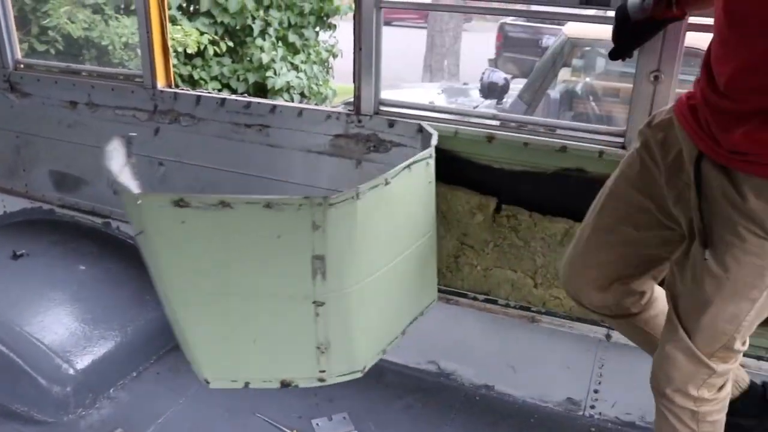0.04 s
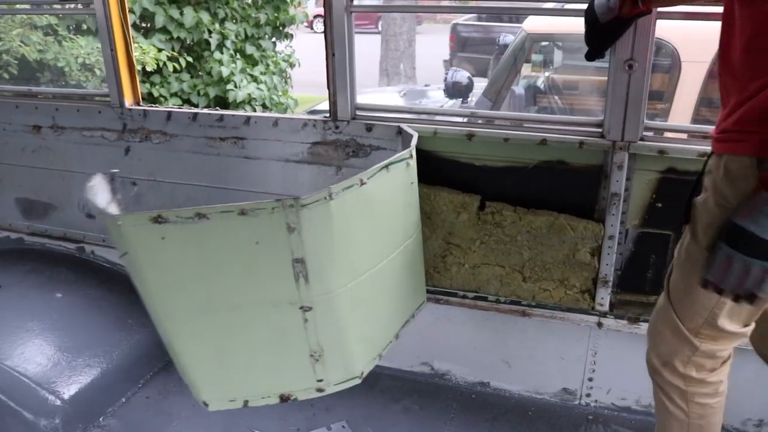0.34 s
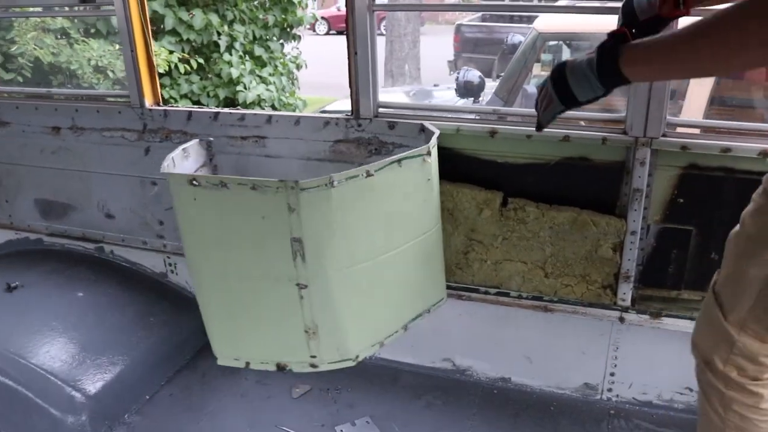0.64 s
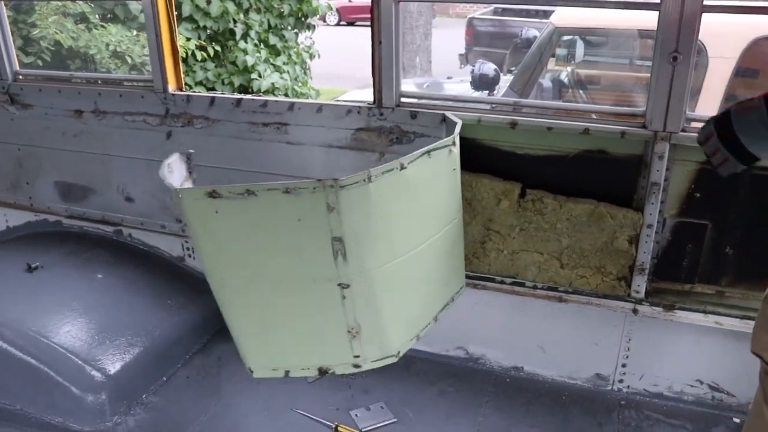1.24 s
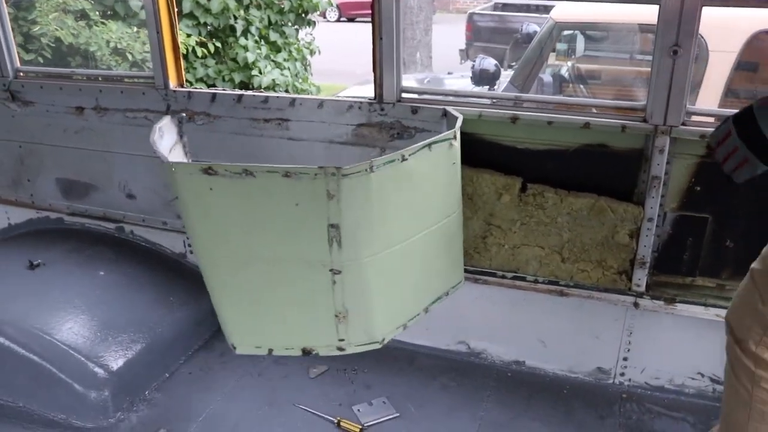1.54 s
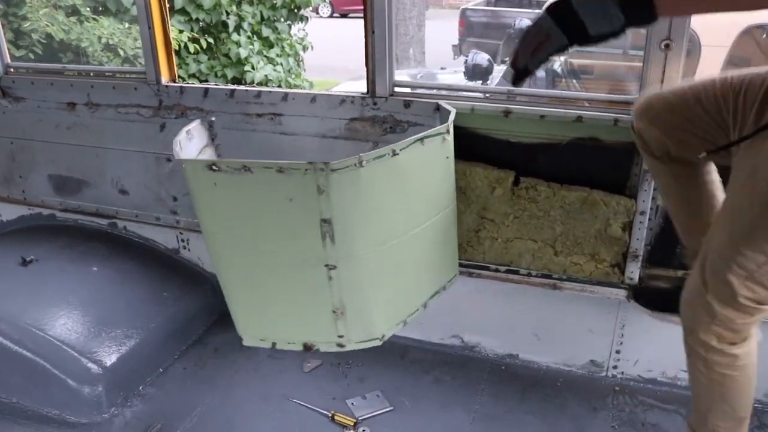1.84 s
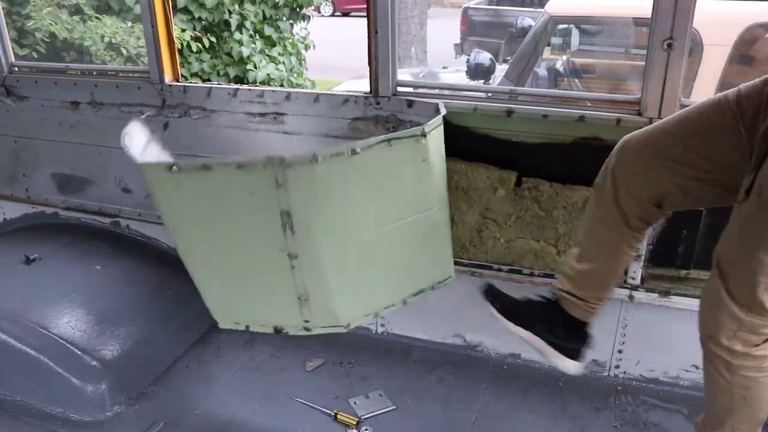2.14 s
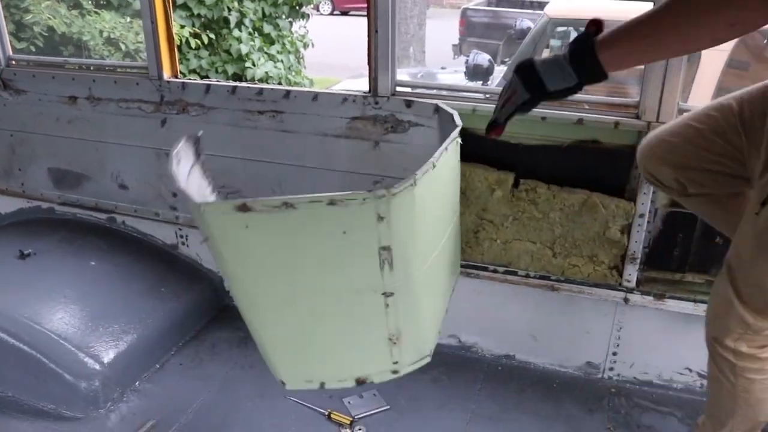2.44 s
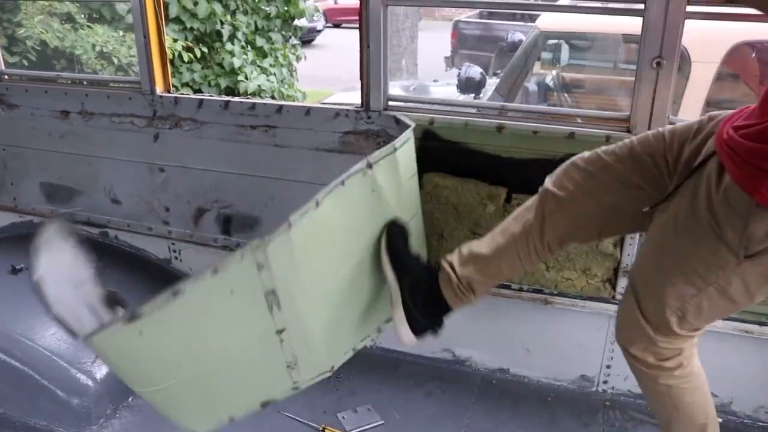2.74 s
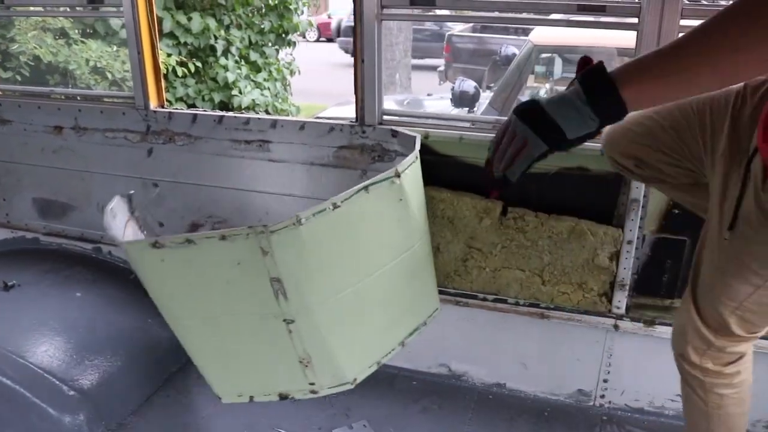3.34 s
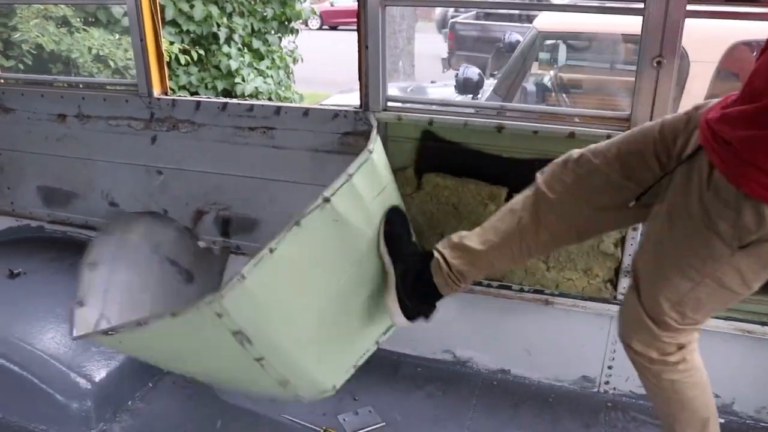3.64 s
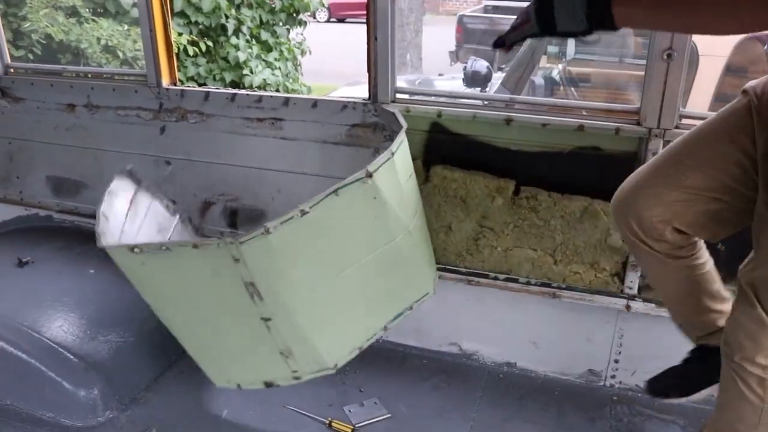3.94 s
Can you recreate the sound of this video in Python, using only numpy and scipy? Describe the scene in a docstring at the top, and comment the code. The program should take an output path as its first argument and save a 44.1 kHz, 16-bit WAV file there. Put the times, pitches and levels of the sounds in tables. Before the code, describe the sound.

A large loose sheet metal panel booms and wobbles, its edge clattering and scraping. It fades, a foot thumps down, then three kicks bang into it, each followed by metallic thunder, close by inside an empty bus.

```python
"""A large curved metal panel, half torn from the wall of an empty bus, still thunders from a kick.
It swings back and booms; its loose edge clatters, scrapes along the wall and is left ringing.
A foot is set down and trousers rustle. From 2 s on the panel is kicked three times: each kick bangs,
then the sheet thunders, its loudness and brightness each swelling and fading along their own curves.
Loose rivets tick along the way, over a faint wash of street noise."""
import sys
import numpy as np
from scipy import signal
from scipy.fft import rfft, irfft, next_fast_len
from scipy.io import wavfile
from scipy.ndimage import uniform_filter1d, minimum_filter1d, map_coordinates

SR = 44100
rng = np.random.default_rng(int(sys.argv[2]) if len(sys.argv) > 2 else 0)


def int16_out(signal):
    """Quantize to a 16-bit WAV file."""
    q = np.round(np.clip(np.atleast_2d(signal).T, -1, 1) * 32767)
    wavfile.write(sys.argv[1], SR, q.astype(np.int16))


N = 176400

# colour of a dull, heavy blow: f/Hz, level/dB
THUD_SPECTRUM = [(25, -13.5), (45, 2.5), (80, -0.5), (130, -9.5), (250, 0.5), (400, -1.5), (900, -38)]
# colour of the loose edge: f/Hz, level/dB
EDGE_SPECTRUM = [(300, -1.5), (1300, 4), (2700, 3.5), (4500, -1.5), (6200, -0.5), (8500, -1), (11500, -2),
                 (15500, -12)]
# stereo image, narrow in the bass and wide on top: f/Hz, left-right correlation
STEREO_LIKENESS = [(190, .9995), (330, .985), (520, .89), (1000, .6), (2000, .41), (4000, .2), (12000, .08)]


def roar():
    """The sheet thunders in dense high modes; loudness and brightness each follow their own curve."""
    # course of the thunder: t/s, level/dB, brightness/dB
    course = [(0.0, -20.5, -8.5), (0.06, -21.5, -11.5), (0.28, -35.5, -16), (0.36, -34, -18),
              (0.44, -26, -30.5), (0.63, -28, -27), (0.66, -24, -23), (0.79, -24, -15), (1.02, -29.5, -21),
              (1.4, -44, -19), (2.012, -39, -11), (2.045, -19, -7), (2.09, -19, -1.5), (2.23, -25, -5),
              (2.32, -21, -10.5), (2.5, -19.5, -17), (2.62, -20.5, -19.5), (2.67, -18.5, -11.5),
              (2.76, -17.5, -4.5), (2.885, -26.5, -3), (2.92, -17.5, -8.5), (3.05, -22.5, -4.5),
              (3.38, -19.5, -14), (3.59, -24.5, -21.5), (3.642, -17.5, -10.5), (3.675, -18.5, -6.5),
              (3.76, -20.5, -5), (3.9, -23.5, -6.5), (3.99, -19, -4)]
    # colour of the thunder: f/Hz, level/dB
    spectrum = [(240, -29), (400, -5.5), (552, -3.5), (605, -3.5), (653, -2.5), (860, -1.5), (1070, -1.5),
                (1220, 0), (2150, -5), (3250, -12), (4920, -27), (8670, -29), (11400, -37.5), (15500, -54)]
    # modes that stand out: f/Hz, level/dB
    modes = [(607, -21.5), (803, -31), (863, -22), (1006, -25), (1198, -21.5), (1335, -26.5), (2087, -27.5)]
    # tilt towards the treble: f/Hz, gain/dB per dB of brightness
    tilt = [(400, -0.36), (900, 0), (1400, 0.36), (2000, 0.68), (3200, 1.32), (5000, 1.5), (9000, 1.6),
            (15000, 2.5)]
    gain_db, flutter_db, neutral_brightness_db = 2.5, 1.29, -8.5
    sheet = crowd(spectrum, spacing_hz=16, ragged_db=1.5)
    sheet += ringing(modes, drift_hz=7.16, drift_rate=30, swell_db=3.5)
    hz, frame_times, bands = signal.stft(sheet, SR, nperseg=512)
    _, brightness_db = curves(course, frame_times)
    tilt_db = along(tilt, hz)[:, None] * (brightness_db - neutral_brightness_db)
    sheet = signal.istft(bands * amp(tilt_db), SR, nperseg=512)[1][:, :N]
    level_db, _ = curves(course, np.arange(N) / SR)
    return sheet * amp(gain_db + level_db + flutter_db * wobble(28.4))


def boom():
    """The sheet's low bending modes swell and sink under the thunder."""
    # swell of the boom: t/s, level/dB
    bend = [(0.0, -30), (0.13, -35.5), (0.29, -34), (0.44, -18.5), (0.62, -25.5), (0.7, -19.5),
            (0.87, -22.5), (1.0, -24.5), (1.25, -27.5), (1.6, -36.5), (1.75, -36), (2.012, -37),
            (2.07, -27.5), (2.2, -28), (2.58, -25.5), (2.7, -27), (2.86, -31.5), (2.96, -27.5),
            (3.4, -24.5), (3.56, -22.5), (3.72, -23), (3.82, -27.5), (4.0, -24)]
    # colour of the boom: f/Hz, level/dB
    spectrum = [(25, -22), (40, -19), (95, -12.5), (125, -8), (170, -5.5), (220, -5.5), (270, -0.5),
                (380, 2.5), (480, -3.5), (680, -4.5), (1200, -44.5)]
    # modes that stand out: f/Hz, level/dB
    modes = [(221, -10.5), (251, -11.5), (299, -14), (373, -12), (410, -16), (460, -15)]
    level_db, = curves(bend, np.arange(N) / SR)
    body = amp(-1) * crowd(spectrum)
    notes = ringing(modes, drift_hz=2.435, drift_rate=14, swell_db=4.0)
    return amp(level_db - 1.5) * (body + notes)


def kicks():
    """The sole bangs on the metal, rings the patch under it and damps it; the leg's weight thuds after."""
    # blows of the shoe and the sheet's rebound; a kick may land heel, then sole:
    # t/s, bang level/dB, treble corner/Hz, hold/s, t60/s, note/Hz, note level/dB, thud level/dB
    blows = [(2.0146, -6, 3820, 0.0044, 0.042, 1194, -12, -22),
             (2.019, -4.5, 750, 0.0037, 0.051, 534, -6.5, -19.5),
             (2.6374, -11, 1440, 0.0087, 0.16, 1322, -3.5, -36),
             (2.907, -17, 1590, 0.0016, .04, 1240, -19.5, -52),
             (3.6062, -12, 4540, 0.011, 0.043, 414, -17.5, -36),
             (3.616, -14.5, 900, 0.0046, 0.031, 405, -10.5, -22.5)]
    # colour of the bang: f/Hz, level/dB
    spectrum = [(60, -17), (220, -7.5), (480, -3), (900, 3), (1400, 0), (2600, 1.5), (4500, -7.5),
                (8000, -2), (15000, -2)]
    # other modes of the struck patch: f/Hz, level/dB relative to its note
    patch_modes = [(245, -6), (375, -8), (488, -1.5), (790, -11.5), (1220, -12), (2470, -12)]
    thud_lag_s, scatter_s = 0.0054, 0.00391
    out = np.zeros((2, N))
    thud = crowd(THUD_SPECTRUM)
    for start, bang_db, corner_hz, hold, t60, note_hz, note_db, thud_db in blows:
        bang = crowd(spectrum, corner_hz, spacing_hz=124.3, ragged_db=-4)
        patch = sum(amp(db) * tone(hz, start - rng.uniform(0, scatter_s)) for hz, db in patch_modes)
        clank = tone(note_hz, start) + patch
        out += amp(bang_db) * blow(start, rise=0.00028, hold=hold, t60=t60) * bang
        out += amp(note_db) * blow(start, rise=0.00069, hold=0.0025, t60=0.041) * clank
        out += amp(thud_db) * blow(start + thud_lag_s, rise=0.0056, hold=0.0089, t60=0.1) * thud
    return out


def surges():
    """One low mode briefly takes over the boom as the sheet swings through."""
    # t/s, f/Hz, level/dB, rise/s, hold/s, t60/s
    swells = [(.3, 222, -26, 0.024, 0.14, 0.35), (.675, 215, -19, 0.022, .08, 0.36),
              (.95, 375.5, -18.5, 0.047, 0.029, 0.13), (1.641, 224, -30.5, 0.016, 0.071, 0.15)]
    return sum(amp(db + wobble(26.2)) * blow(start, rise, hold, t60) * tone(hz, start)
               for start, hz, db, rise, hold, t60 in swells)


def clatter():
    """The loose panel chatters unevenly and rings in thin high modes."""
    # clatters of the panel, its edge on the wall and its rebound after the last kick:
    # t/s, level/dB, rise/s, t60/s, treble corner/Hz
    clatters = [(0.465, -39.5, .002, 0.48, 5000), (0.642, -21.5, 0.006, 0.48, 6900),
                (0.704, -27, 0.014, 0.33, 15500), (.772, -27.5, .008, 0.26, 9000),
                (1.499, -45.5, 0.0027, 0.15, 12000), (1.711, -31, .001, 0.034, 1090),
                (2.717, -19.5, .002, 0.075, 2800), (2.902, -28.5, 0.0034, 0.35, 14000),
                (3.66, -19, .004, 0.061, 1800)]
    chatter_db = 1.6
    out = np.zeros((2, N))
    for start, db, rise, t60, corner_hz in clatters:
        metal = crowd(EDGE_SPECTRUM, corner_hz, spacing_hz=67.65, ragged_db=4)
        out += amp(db) * blow(start, rise, hold=0.014, t60=t60) * metal
    return out * amp(chatter_db * wobble(230))


def scrape():
    """The edge scrapes along the wall and is left ringing in a few rough resonances."""
    # resonances of the rim: f/Hz, level/dB, t60/s
    rim = [(1238, -34, 1), (1314, -25.5, 0.66), (2283, -31.5, 0.81), (2430, -36, 0.59), (2714, -30, 0.62),
           (5800, -37.5, .5), (8780, -31.5, 0.26)]
    out = np.zeros((2, N))
    for hz, db, t60 in rim:
        width_hz = 12 * (hz / 1000) ** 1.7  # higher ones are broader and rougher
        out += amp(db) * blow(0.758, rise=0.023, hold=0.024, t60=t60) * resonance(hz, width_hz)
    return out


def ticks():
    """Loose rivets tick in their holes, each a thin resonance over a broad click."""
    # t/s, level/dB, t60/s, f/Hz
    rivets = [(0.463, -32.5, 0.07, 7800), (1.668, -40.5, 0.31, 7840), (2.022, -15, 0.013, 9700),
              (2.822, -27, 0.15, 8000), (3.6103, -14, 0.014, 9100), (3.25, -44, 0.16, 10500),
              (3.6445, -22, .012, 13000)]
    click = amp(-0.5) * crowd(EDGE_SPECTRUM)
    out = np.zeros((2, N))
    for start, db, t60, hz in rivets:
        ping = resonance(hz, width_hz=800)
        out += amp(db) * blow(start, rise=0.00013, hold=0.00063, t60=t60) * (ping + click)
    return out


def thumps():
    """Feet and the panel's foot thump on the bus floor, each with the low note of its spot."""
    # t/s, thud level/dB, t60/s, note/Hz, note level/dB
    blows = [(0.651, -23.5, 1, 67, -37), (1.641, -25, 0.17, 94, -21), (1.704, -28.5, 0.56, 78, -29.5),
             (3.683, -23.5, 0.15, 66.6, -31)]
    thud = crowd(THUD_SPECTRUM)
    out = np.zeros((2, N))
    for start, thud_db, t60, note_hz, note_db in blows:
        floor = amp(thud_db) * thud + amp(note_db) * tone(note_hz, start)
        out += blow(start, rise=0.0032, hold=0.014, t60=t60) * floor
    return out


def rustle():
    """Trouser cloth rubs as the leg draws back."""
    # swell of the rustle: t/s, level/dB
    swell = [(1.6, -54), (1.67, -42), (1.76, -40.5), (2, -41), (2.03, -50)]
    # colour of the cloth: f/Hz, level/dB
    spectrum = [(200, 3), (1200, 6.5), (2400, 1), (4800, -8), (7500, -2), (11000, -3.5), (15500, -20)]
    level_db, = curves(swell, np.arange(N) / SR)
    return amp(level_db + 0.52 * wobble(40.2)) * crowd(spectrum)


def bus_echo(x):
    """The bare interior answers with a short echo."""
    # decay of the interior: f/Hz, t60/s
    decay = [(100, 0.37), (1000, 0.71), (10000, 0.58)]
    hz, t, bands = signal.stft(rng.standard_normal((2, SR // 2)), SR, nperseg=256)
    fade = np.exp(-np.log(1000) * t / along(decay, hz)[:, None])
    tail = signal.istft(bands * fade, SR, nperseg=256)[1]
    tail /= np.linalg.norm(tail[0])
    mid, side = signal.fftconvolve(x.mean(0)[None], tail, axes=1)[:, :N]
    side = filtered(side, lambda hz: np.sqrt(np.clip(1 - along(STEREO_LIKENESS, hz), 0, 1)))
    return np.array([mid + side, mid - side])


def street():
    """A steady, dark wash of street noise."""
    # f/Hz, level/dB
    spectrum = [(20, 0), (35, 3), (90, 8.5), (200, 1), (1000, -8.5), (4500, -24.5), (8000, -27.5),
                (15500, -49)]
    return amp(-39.5) * crowd(spectrum)


def crowd(spectrum, corner_hz=None, spacing_hz=20, ragged_db=0):
    """Overlapping resonances as stereo noise, rms 1; ragged_db sets how far they stand out."""
    def response(hz):
        spread = np.arccos(np.clip(along(STEREO_LIKENESS, hz), -1, 1)) / 2
        ripple = np.interp(hz / max(spacing_hz, 6), np.arange(4000), rng.standard_normal(4000))
        lowpass = 1 if corner_hz is None else 1 / np.sqrt(1 + (hz / corner_hz) ** 4)
        colour = amp(along(spectrum, hz) + ragged_db * ripple) * lowpass
        return colour * [np.cos(spread), np.sin(spread)]
    mid, side = filtered(rng.standard_normal((2, N)), response)
    return unit(np.array([mid + side, mid - side]))


def ringing(modes, drift_hz, drift_rate, swell_db):
    """Modes whose pitch and strength waver as the sheet bends."""
    out = np.zeros(N)
    for hz, db in modes:
        strength = amp(db + swell_db * wobble(11))
        pitch_hz = hz + drift_hz * wobble(drift_rate)
        out += strength * np.sqrt(2) * np.sin(2 * np.pi * np.cumsum(pitch_hz) / SR)
    return out


def resonance(hz, width_hz):
    """Stereo noise in one resonance, rms 1."""
    return unit(filtered(rng.standard_normal((2, N)), lambda f: 1 / (1 + ((f - hz) / width_hz) ** 2)))


def tone(hz, start):
    """A sine that crosses zero at start."""
    return np.sin(2 * np.pi * hz * (np.arange(N) / SR - start))


def blow(start, rise, hold, t60):
    """Envelope of one blow: rise, hold, exponential fall, all in seconds."""
    t = np.arange(N) / SR - start
    attack = np.clip(t / max(rise, 1e-4), 0, 1)
    return attack * np.exp(-np.log(1000) * np.maximum(t - rise - hold, 0) / t60)


def wobble(rate):
    """A smooth random curve, rate knots a second."""
    knots = rng.standard_normal(int(N * rate / SR) + 4)
    return map_coordinates(knots, [np.arange(N) * rate / SR])


def filtered(x, response):
    """Equalise x with the gain response(hz)."""
    size = next_fast_len(N + 8192)
    return irfft(rfft(x, size) * response(np.fft.rfftfreq(size, 1 / SR)), size)[..., :N]


def along(points, hz):
    """Read (f/Hz, value) points at hz on a log axis."""
    freqs, values = np.transpose(points)
    return np.interp(np.log(hz + 1), np.log(np.abs(freqs) + 1), values)


def curves(rows, t):
    """Each column after the time, read at times t."""
    times, *columns = np.transpose(rows)
    return [np.interp(t, times, column) for column in columns]


def amp(db):
    """Decibels to gain."""
    return 10 ** (np.asarray(db) / 20)


def unit(x):
    """Scale to rms 1."""
    return x / np.sqrt(np.mean(x ** 2) + 1e-20)


def scene():
    """Panel, feet and street inside the bus; only kicks and clatter feed the echo."""
    # stereo balance, the treble leaning right: f/Hz, left minus right/dB
    balance = [(150, 0), (400, .6), (900, .4), (2400, -3), (4800, -1.5), (8500, -2.1), (14000, -1.4)]
    hits = kicks() + clatter()
    mix = hits + amp(-11.5) * bus_echo(hits) + roar() + boom()
    mix += thumps() + scrape() + ticks() + surges() + rustle() + street()
    return filtered(mix, lambda hz: amp(np.outer([.5, -.5], along(balance, hz))))


def record(dry):
    """A fast limiter holds down the hardest bangs; a steep low-pass cuts the very top."""
    ceiling, hold_s, top_hz = 0.99, 0.0003, 15750
    window = 2 * int(hold_s * SR / 2) + 1
    needed_gain = np.minimum(1, ceiling / (np.abs(dry).max(0) + 1e-9))
    gain = uniform_filter1d(minimum_filter1d(needed_gain, window), window)
    return filtered(dry * gain, lambda hz: hz < top_hz)


dry = scene()
out = record(dry)
int16_out(out)
```